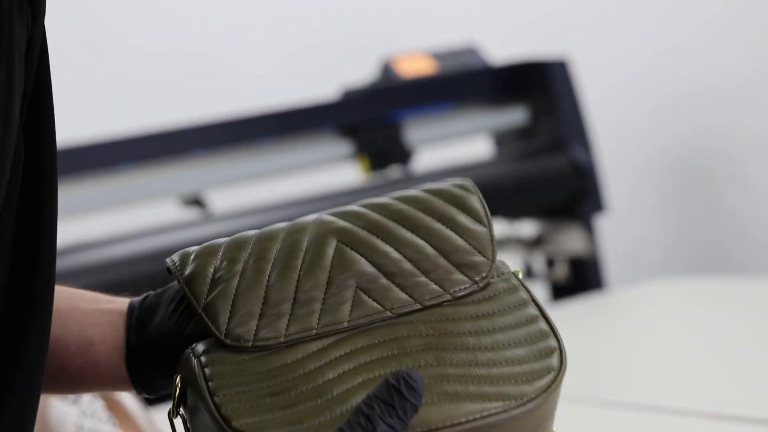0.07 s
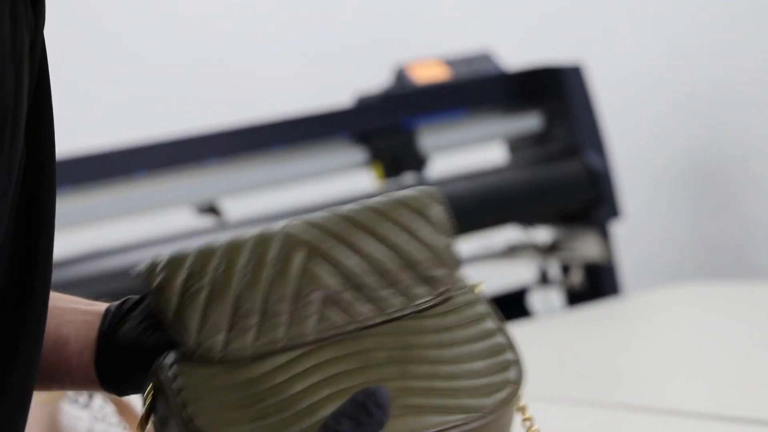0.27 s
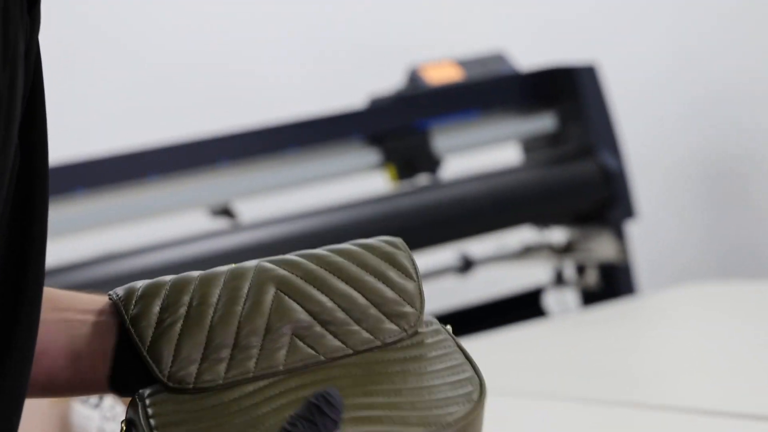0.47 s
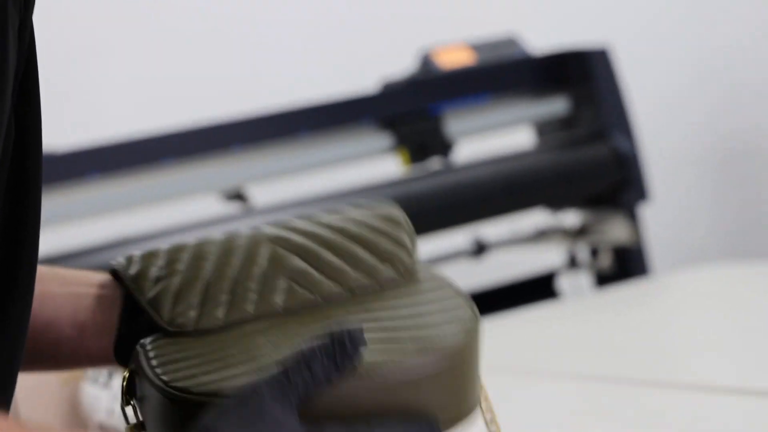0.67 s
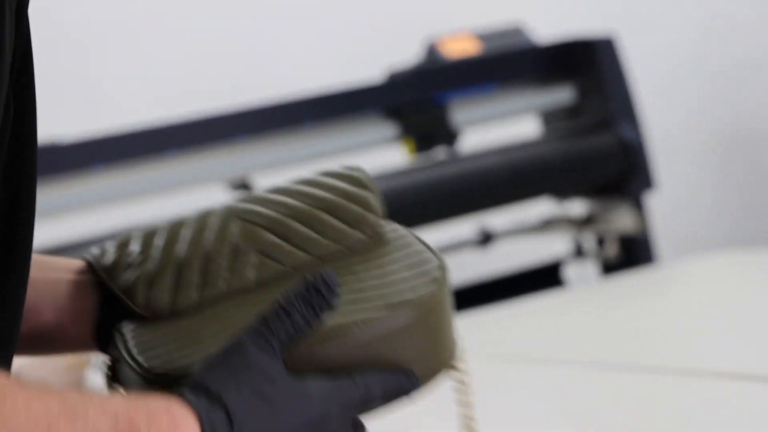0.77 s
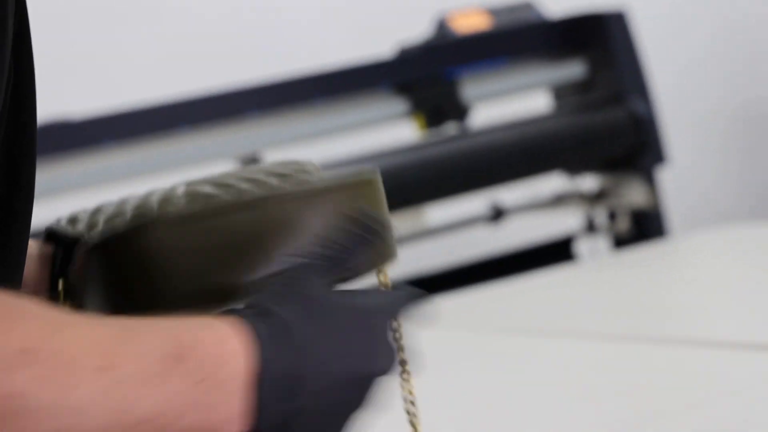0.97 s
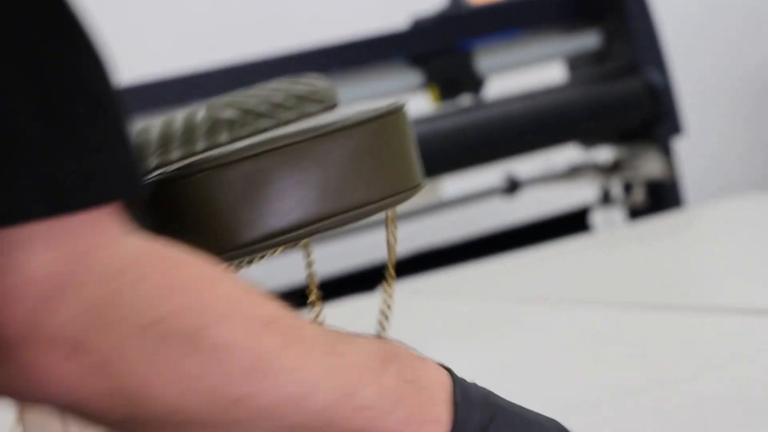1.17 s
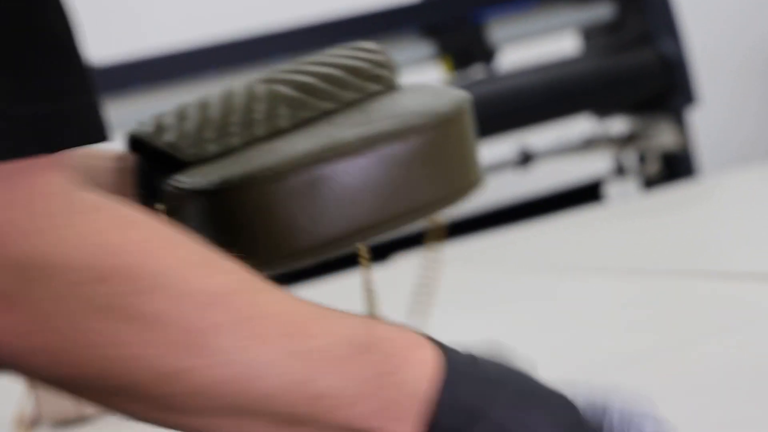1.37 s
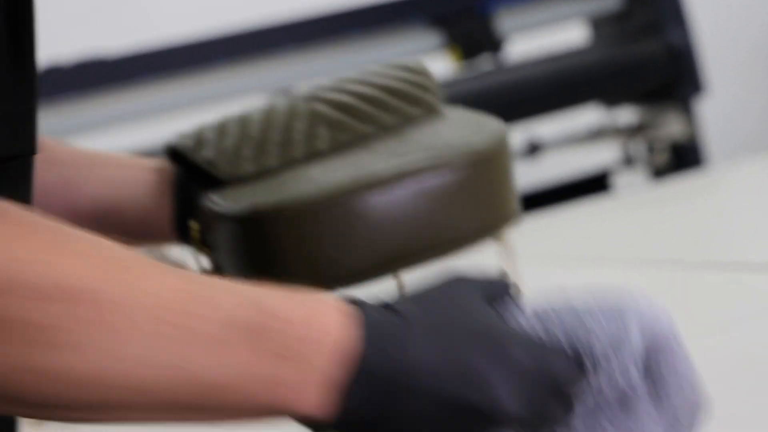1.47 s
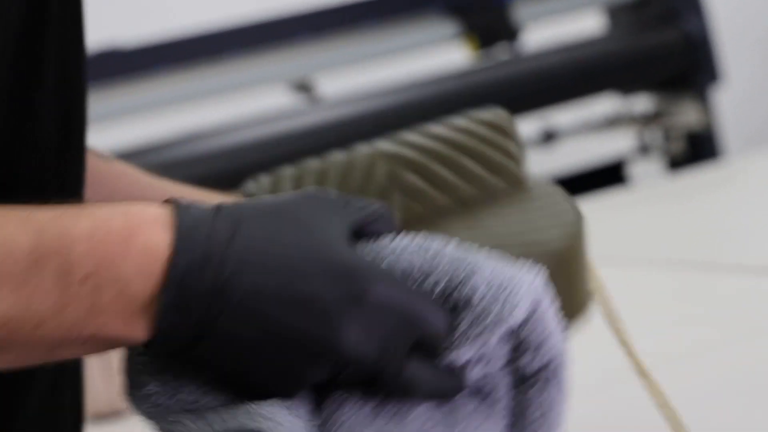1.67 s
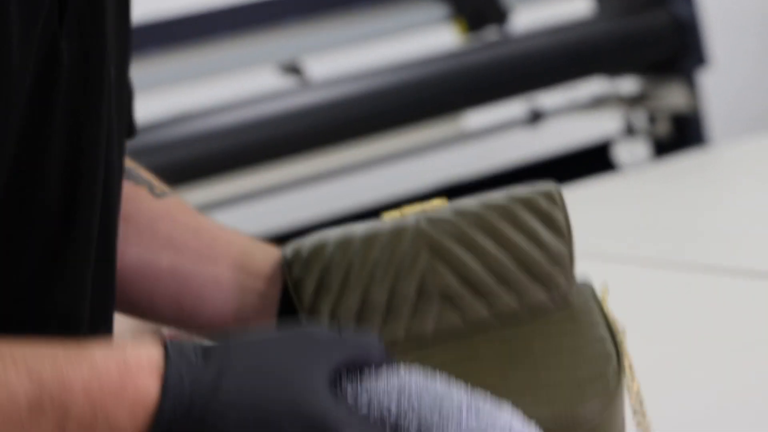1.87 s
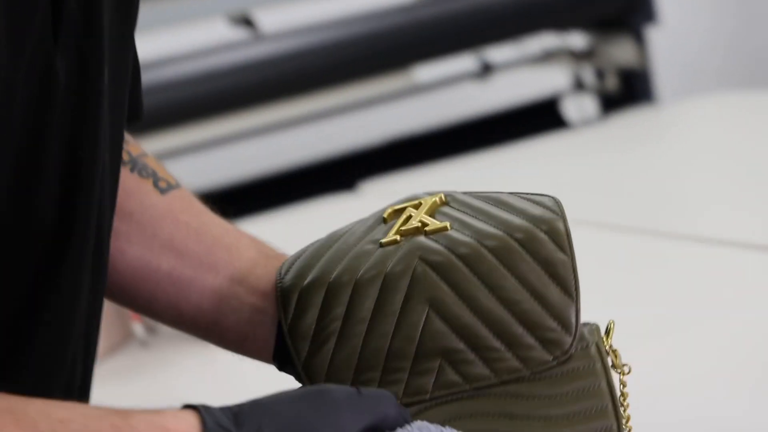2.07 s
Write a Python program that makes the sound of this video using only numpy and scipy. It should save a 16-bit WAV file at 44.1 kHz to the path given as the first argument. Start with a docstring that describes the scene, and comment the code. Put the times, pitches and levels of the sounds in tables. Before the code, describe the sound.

A microfiber cloth wipes a leather purse in quick hissy strokes that fade, then the bag knocks softly on a table and a louder, longer stroke follows; close microphone, quiet workshop with a faint low hum.

```python
"""A microfiber cloth wipes a quilted leather purse; a quiet workshop hums behind throughout.
The first stroke is under way, then two catch abruptly: random stick-slip jerks through leather and
fibre filters, with ticks and a seam snag. The purse then knocks softly on a table and scuffs: filtered
jerks plus ringing table modes. A fourth, long stroke catches, snags and gains a thin whistle."""
import sys
import numpy as np
from scipy import signal
from scipy.fft import rfft, irfft
from scipy.io import wavfile

SR = 44100
rng = np.random.default_rng(int(sys.argv[2]) if len(sys.argv) > 2 else 0)


def wav_out(sig):
    """Save sig, one row per channel (or a flat mono array), as 16-bit PCM at SR to the path in sys.argv[1]."""
    wavfile.write(sys.argv[1], SR, np.round(np.clip(np.atleast_2d(sig).T, -1, 1) * 32767).astype(np.int16))


N = 94109


def amp(db):
    """Decibels to amplitude gain."""
    return 10 ** (np.asarray(db) / 20)


def even(x):
    """Scale to rms 1."""
    return x / np.sqrt(np.mean(x ** 2) + 1e-20)


def colour(x, points):
    """Causal minimum-phase filter with the given spectrum, falling steeply outside it; rms 1."""
    f, db = np.transpose(points)
    hz = np.fft.rfftfreq(8192, 1 / SR) + 1
    octaves_outside = np.log2(np.maximum(f[0] / hz, 1) * np.maximum(hz / f[-1], 1))
    curve_db = np.interp(np.log(hz), np.log(f), db) - 24 * octaves_outside
    log_gain = np.maximum(curve_db, -100) * np.log(10) / 20
    log_gain = np.r_[log_gain, log_gain[-2:0:-1]]
    # minimum phase: the Hilbert transform of the log gain
    taps = np.fft.ifft(np.exp(np.conj(signal.hilbert(log_gain)))).real[:4096]
    return even(signal.oaconvolve(x, taps)[:N])


def ring(x, hz, width_hz):
    """A resonance (double pole) that follows the curve hz; rms 1."""
    turn = np.exp(2j * np.pi * np.cumsum(hz * np.ones(N)) / SR)
    r = np.exp(-np.pi * width_hz / SR)
    # shift hz down to zero, smooth, shift back
    smoothed = signal.lfilter([1], [1, -2 * r, r * r], x / turn)
    return even((turn * smoothed).real)


def wobble(hz):
    """Slow chance up to about the given rate; rms 1."""
    f = np.fft.rfftfreq(N, 1 / SR)
    return even(irfft(rfft(rng.standard_normal(N)) / (1 + (f / hz) ** 4), N))


def slips(per_s, spread_db):
    """Tiny stick-slip jerks of random time, sign and size."""
    u = rng.random((N, 3))
    happens = u[:, 0] < per_s / SR
    sign = np.sign(u[:, 1] - .5)
    size = amp(-spread_db * np.log(u[:, 2] + 0.029))
    return happens * sign * size


CATCH_S = 0.00026


def levels(table):
    """Gains of the columns of one gesture: a sudden catch, the curve, a sudden stop."""
    rows, t = np.array(table), np.arange(N) / SR
    start = rows[0, 0] if rows[0, 0] > 0 else -1  # from time 0: already under way
    rise = np.clip((t - start) / CATCH_S, 0, 1)
    stop = np.clip((rows[-1, 0] - t) / CATCH_S + 1, 0, 1)
    return [rise * stop * amp(np.interp(t, rows[:, 0], c)) for c in rows.T[1:]]


# room air spectrum: (frequency [Hz], density [dB per Hz])
AIR_SPECTRUM = [(25, -20), (60, 5), (130, -5.5), (250, -5), (500, -3.5), (1000, -10), (3000, -17.5),
                (6400, -26), (16000, -39)]
AIR_RMS_DB = -49.5
# motor partials: (frequency [Hz], level before HUM_TRIM_DB [dB peak])
MOTOR_HUM = [(58.2, -83), (80.2, -55), (116.6, -45.5), (174.4, -55), (232, -58.5)]
HUM_TRIM_DB, HUM_WAVER_DB, HUM_WAVER_HZ = -1.0, 1.2, 7.8


def workshop():
    """Broadband room air and motor partials whose levels waver independently."""
    t = np.arange(N) / SR
    hum = np.zeros(N)
    for hz, db in MOTOR_HUM:
        gain = amp(db + HUM_TRIM_DB + HUM_WAVER_DB * wobble(HUM_WAVER_HZ))
        hum = hum + gain * np.sin(2 * np.pi * (hz * t + rng.random()))
    return amp(AIR_RMS_DB) * colour(rng.standard_normal(N), AIR_SPECTRUM) + hum


# one table per stroke:
# (time [s], level [dB], dull leather rub re level [dB], bright fibre hiss re level [dB])
WIPE_STROKES = [
    [(0, -30, -4.5, -20.5), (.055, -26.5, -9.5, -26.5), (.09, -35.5, -5, -21), (.14, -33, -3.5, -25)],
    [(.1412, -22.5, -17, -18), (.165, -21, -10.5, -22.5), (.21, -28.5, -9, -24), (.27, -40.5, -12.5, -19),
     (.33, -48, -12, -11), (.371, -52.5, -12, -6)],
    [(.3722, -20.5, -14, -17), (.385, -25.5, -6, -20), (.41, -20.5, -11.5, -22), (.46, -24.5, -6.5, -24),
     (.525, -33, -5, -41), (.54, -32, -7.5, -31), (.58, -35.5, -3, -33), (.63, -32.5, -1, -23),
     (.68, -35, -2.5, -35), (.76, -44.5, 1.5, -46), (.9, -64, 1.5, -35)],
    [(1.5358, -14, -11, -17), (1.543, -11.5, -14.5, -16.5), (1.59, -14, -10.5, -21),
     (1.65, -18.5, -10.5, -19), (1.75, -18, -13, -19.5), (1.8, -20.5, -8.5, -21), (1.9, -19, -8.5, -17),
     (1.97, -22.5, -11, -19), (2.03, -25, -10.5, -19.5), (2.11, -30, -6.5, -20), (2.134, -26.5, -10, -20)],
]
# leather rub, dull rub, fibre hiss: (frequency [Hz], density [dB per Hz])
RUB_SPECTRUM = [(900, -21), (1100, -10.5), (1500, -5), (2100, -3.5), (2700, 1.5), (3300, -1.5), (3900, -5),
                (4900, -7.5), (8000, -30)]
DULL_SPECTRUM = [(60, -35.5), (120, -13.5), (250, -9), (500, -6.5), (900, -6), (1400, -3), (2200, -18.5),
                 (3300, -36)]
HISS_SPECTRUM = [(5000, -8), (7000, -4), (9000, -7), (10400, -14), (12200, -16), (16000, -20)]
# two leather resonances, shifting as the bag is turned and pressed:
# (time [s], upper [Hz], upper level re rub [dB], lower [Hz], lower level re rub [dB])
LEATHER_RINGS = [(0, 2990, -7.5, 2870, -3), (.16, 3120, -4, 2600, -28), (.3, 2990, -7.5, 2550, -11),
                 (.4, 3250, -2, 2460, -20), (.47, 3040, -5, 2700, -5.5), (.62, 3027, 0, 2530, 0),
                 (1.54, 3110, -8, 2620, -10), (1.63, 3160, -5.5, 2830, -14), (1.93, 3265, -1, 3050, -7),
                 (2.1, 3050, -1, 2550, -5.5)]
# thin high whistle in the long stroke: (time [s], level [dB])
WHISTLE_LEVEL = [(1.62, -68), (1.66, -58), (2.134, -61)]
WHISTLE_HZ, WHISTLE_WIDTH_HZ = 11330, 170
UPPER_WIDTH_HZ, LOWER_WIDTH_HZ = 330, 560  # per pole
RING_WANDER_HZ, RING_WANDER_RATE_HZ = 35, 8.7
SLIPS_PER_S, SLIP_SPREAD_DB = 10000, 2
JUDDER_DB, JUDDER_HZ = 1.3, 98
PATCHY_DB, FLICKER_DB = .9, 1.4  # rms


def cloth():
    """Dense slips under a juddering hand excite the leather, its two rings and the fibres."""
    jerks = slips(SLIPS_PER_S, SLIP_SPREAD_DB) * amp(JUDDER_DB * wobble(JUDDER_HZ))
    steady = slips(SLIPS_PER_S, SLIP_SPREAD_DB)
    both = jerks + steady
    times, *columns = np.transpose(LEATHER_RINGS)
    up_hz, up_db, low_hz, low_db = [np.interp(np.arange(N) / SR, times, c) for c in columns]
    rub = colour(jerks, RUB_SPECTRUM)
    for hz, db, width_hz in (up_hz, up_db, UPPER_WIDTH_HZ), (low_hz, low_db, LOWER_WIDTH_HZ):
        gain = amp(db + PATCHY_DB * wobble(35))
        wandering_hz = hz + RING_WANDER_HZ * wobble(RING_WANDER_RATE_HZ)
        rub = rub + gain * ring(both, wandering_hz, width_hz)
    rub = even(rub)
    dull = colour(both, DULL_SPECTRUM) * amp(PATCHY_DB * wobble(14))
    hiss = colour(both, HISS_SPECTRUM) * amp(FLICKER_DB * wobble(36))
    whistle_gain = levels(WHISTLE_LEVEL)[0] * amp(PATCHY_DB * wobble(12))
    out = whistle_gain * ring(steady, WHISTLE_HZ, WHISTLE_WIDTH_HZ)
    for stroke in WIPE_STROKES:
        main, low, high = levels(stroke)
        out = out + main * (rub + low * dull + high * hiss)
    return out


# fibres snap free: (time [s], level [dB], treble level [dB])
FIBRE_TICKS = [(0.141, -19.5, -52), (0.3744, -26.5, -52), (0.393, -20, -41), (0.537, -26, -61),
               (1.196, -33, -46), (1.553, -35, -29), (1.627, -29, -48), (1.812, -13, -50),
               (1.837, -13.5, -45), (1.896, -13, -44), (1.955, -13.5, -48)]
# leather's answer to a snap: (frequency [Hz], density [dB per Hz])
SNAP_SPECTRUM = [(1200, -16), (2500, -7), (3300, 0), (4200, -9), (7000, -20)]
TICK_T60_S = .02


def ticks():
    """Snapping fibres: decaying noise bursts coloured by the leather, with a spit of treble."""
    t, shape, spit = np.arange(N) / SR, np.zeros(N), np.zeros(N)
    for s, db, treble_db in FIBRE_TICKS:
        fall = (t > s) * amp(-60 * np.abs(t - s) / TICK_T60_S)
        shape = shape + amp(db) * fall
        spit = spit + amp(treble_db) * fall
    snap = np.sqrt(np.mean(shape ** 2)) * colour(shape * rng.standard_normal(N), SNAP_SPECTRUM)
    return snap + spit * colour(rng.standard_normal(N), HISS_SPECTRUM)


# the cloth snags on a seam: (time [s], frequency [Hz], level [dB])
SEAM_SNAGS = [(0.621, 1220, -25), (1.544, 1037, -9.5)]
SNAG_RISE_S, SNAG_T60_S, SNAG_WIDTH_HZ = 0.0052, .06, 320


def snags():
    """Duller than the ticks: noise through one resonance per snag, quick rise and decay."""
    t, out = np.arange(N) / SR, np.zeros(N)
    noise = rng.standard_normal(N)
    for s, hz, db in SEAM_SNAGS:
        rise = np.clip((t - s) / SNAG_RISE_S, 0, 1)
        fall = amp(db - 60 * np.abs(t - s) / SNAG_T60_S)
        out = out + rise * fall * ring(noise, hz, SNAG_WIDTH_HZ)
    return out


# (time [s], thud level [dB], scuff level [dB], bright rustle level [dB])
KNOCK_LEVELS = [(1.194, -32, -38.5, -62), (1.235, -25, -33, -53.5), (1.29, -31.5, -32, -45.5),
                (1.312, -33, -38.5, -55.5), (1.37, -37, -46.5, -60.5), (1.402, -48, -46.5, -52),
                (1.438, -41, -49.5, -58.5), (1.498, -58, -51.5, -60), (1.53, -47, -63, -61)]
# thud, scuff, rustle: (frequency [Hz], density [dB per Hz])
THUD_SPECTRUM = [(60, -33), (110, -1), (175, -6), (280, -4), (450, -4), (1200, -28)]
SCUFF_SPECTRUM = [(410, -37), (700, -3.5), (1360, -6), (2300, -11), (3200, -10.5), (4000, -19.5),
                  (8000, -33)]
RUSTLE_SPECTRUM = [(6000, 3.5), (9000, 0.5), (12500, -1.5), (16000, 0)]
BUMPS_PER_S, BUMP_SPREAD_DB = 1500, 1.5


def knock():
    """Soft bag on the table: sparse jerks make a lumpy thud, dense ones a scuff and a rustle."""
    low, mid, high = levels(KNOCK_LEVELS)
    scrape = slips(SLIPS_PER_S, SLIP_SPREAD_DB)
    thud = low * colour(slips(BUMPS_PER_S, BUMP_SPREAD_DB), THUD_SPECTRUM)
    scuff = mid * colour(scrape, SCUFF_SPECTRUM)
    return thud + scuff + high * colour(scrape, RUSTLE_SPECTRUM)


# the bag settles: (time [s], level [dB])
SETTLING_BUMPS = [(1.195, -19), (1.221, -16.5), (1.242, -14.5), (1.27, -16.5), (1.299, -14.5)]
# table-top modes: (frequency [Hz], level re bump [dB], t60 [s])
TABLE_MODES = [(126, -9, 0.4), (215, -7, 0.06), (265, -9, 0.4), (407, -11, 0.09), (510, -16, .08)]


def bumps():
    """Each bump is an impulse that rings the decaying table-top modes."""
    t, hits = np.arange(8000) / SR, np.zeros(N)
    for s, db in SETTLING_BUMPS:
        hits[round(s * SR)] = amp(db)
    top = sum(amp(db - 60 * t / t60) * np.sin(2 * np.pi * hz * t) for hz, db, t60 in TABLE_MODES)
    return -signal.oaconvolve(hits, top)[:N]


ROOM_T60_S, ROOM_DB, ROOM_DELAY_S = .35, -13, .004


def room(x):
    """Diffuse tail, duller than the direct sound: convolution with decaying low-passed noise."""
    t = np.arange(SR // 2) / SR
    noise = signal.lfilter([1], [1, -.5], rng.standard_normal(len(t)))
    tail = noise * amp(-60 * t / ROOM_T60_S) * (t > ROOM_DELAY_S)
    before = x[4000:0:-1]  # mirrored opening: the rubbing is already under way at the start
    wet = signal.fftconvolve(np.r_[before, x], tail / np.linalg.norm(tail))
    return wet[len(before):][:N]


def scene():
    """Near sounds, their room tail and the workshop, in mono."""
    near = cloth() + ticks() + snags() + knock() + bumps()
    return (near + amp(ROOM_DB) * room(near) + workshop())[None]


MIC_LOW_HZ, EDGE_HZ = 46.5, 15800


def record(dry):
    """The microphone's bass roll-off and the band limit."""
    thin = signal.sosfilt(signal.butter(2, MIC_LOW_HZ, "high", fs=SR, output="sos"), dry)
    low_pass = signal.firwin(511, EDGE_HZ, window=("kaiser", 9), fs=SR)
    return signal.oaconvolve(thin, low_pass[None], "same")


dry = scene()
out = record(dry)
wav_out(out)
```